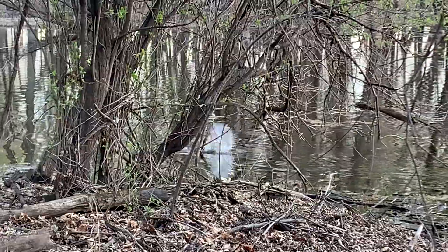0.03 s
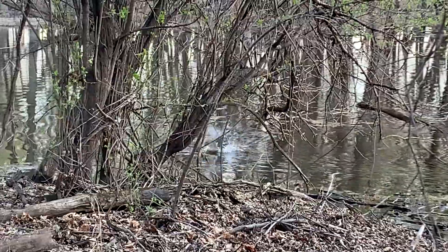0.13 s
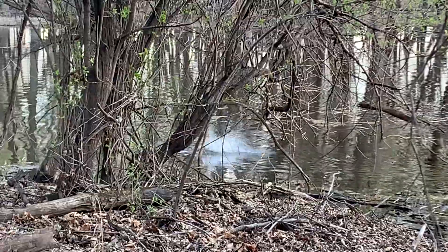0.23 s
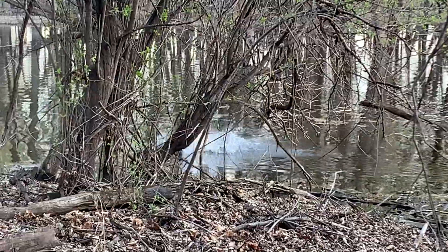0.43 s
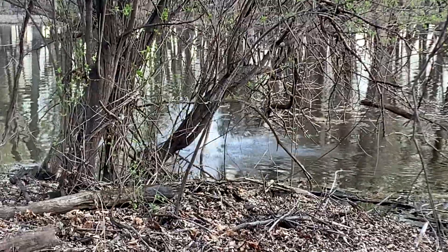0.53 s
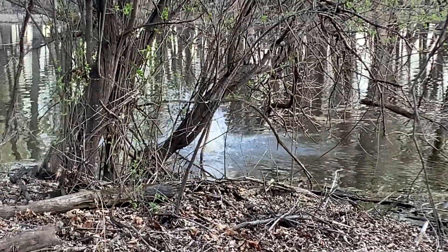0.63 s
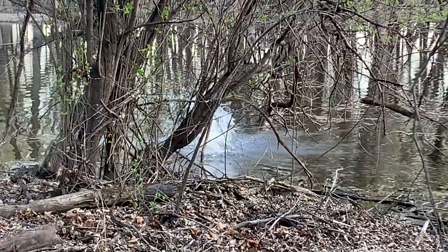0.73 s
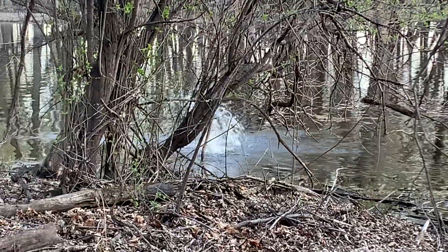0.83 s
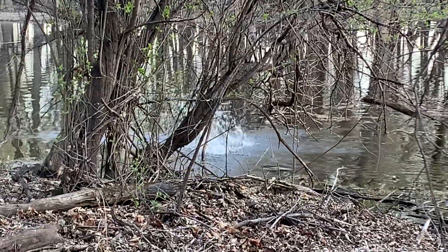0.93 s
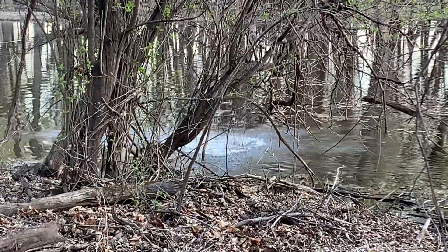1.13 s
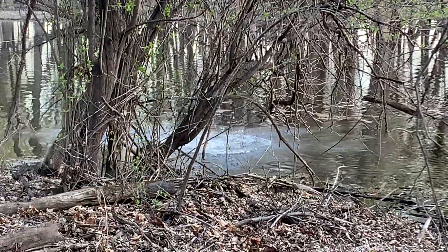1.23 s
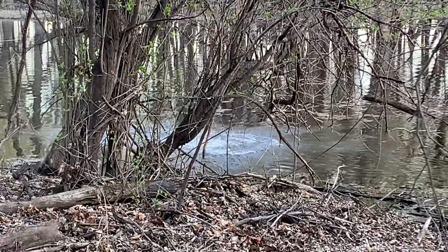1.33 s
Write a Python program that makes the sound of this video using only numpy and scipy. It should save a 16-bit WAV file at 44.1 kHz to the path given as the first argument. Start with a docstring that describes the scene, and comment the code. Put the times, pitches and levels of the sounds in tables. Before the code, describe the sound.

Sharp beaver tail slap on still water, then a hollow gulp and two showers of drops

```python
"""Low outdoor rumble and faint lapping on a wooded pond, then a beaver slaps its tail.
A brief noise swell leads into a noise crack; snaps and a short thump of trapped air are decaying sines.
A quarter second later the hole in the water closes: a deep whump, one sine gliding in pitch.
Thrown water falls back in two showers of small rings, with single ticks and plinks.
The trunks return the slap as decaying noise echoes."""
import sys
import numpy as np
from scipy import signal
from scipy.fft import rfft, irfft
from scipy.io import wavfile

SR = 44100
rng = np.random.default_rng(int(sys.argv[2]) if len(sys.argv) > 2 else 0)


def waveform_to_disk(signal):
    """Save audio, clipped to [-1, 1], as 16-bit WAV at the path in sys.argv[1]."""
    frames = np.transpose(np.atleast_2d(signal))
    scaled = np.clip(frames, -1, 1) * 32767
    samples = np.round(scaled).astype(np.int16)
    wavfile.write(sys.argv[1], SR, samples)


N = 61739

SLAP_S = .22065


def undb(db):
    """Decibels to gain."""
    return 10 ** (np.asarray(db) / 20)


def unit(x):
    """Scale to rms 1."""
    return x / np.sqrt(np.mean(x ** 2))


def seconds():
    """Time of every sample."""
    return np.arange(N) / SR


def bins_hz():
    """Frequency of every bin of a spectrum padded to 2 N."""
    return np.arange(N + 1) * SR / (2 * N)


def curve(table, axis=1):
    """One column of a table, joined by straight lines in time."""
    rows = np.array(table)
    return np.interp(seconds(), rows[:, 0], rows[:, axis])


def by_hz(points):
    """Points joined on a log-frequency axis, for every bin of the padded spectrum."""
    rows = np.array(points)
    return np.interp(np.log(bins_hz() + 1), np.log(rows[:, 0]), rows[:, 1])


def shape(x, response):
    """Filter by a frequency response."""
    return irfft(rfft(x, 2 * N) * response)[:N]


def colour(x, points):
    """Causal minimum-phase filter through (frequency [Hz], level [dB]) points."""
    cepstrum = irfft(np.log(undb(by_hz(points))))
    # fold the cepstrum onto positive time
    cepstrum[1:N] *= 2
    cepstrum[N + 1:] = 0
    return shape(x, np.exp(rfft(cepstrum)))


def add(out, start_s, sound):
    """Mix a sound in at a time."""
    i = max(int(start_s * SR), 0)
    out[i:i + len(sound)] += sound[:max(N - i, 0)]


def grains(rate_per_s, low_hz, high_hz, cycles, spread_db, glide=0.063):
    """A steady rain of little decaying rings, each rising in pitch; rms 1."""
    out = np.zeros(N)
    own = np.random.default_rng(rng.integers(1 << 30))
    for when, pitch, size, length in own.random((int(rate_per_s * N / SR), 4)):
        hz = low_hz * (high_hz / low_hz) ** pitch
        life_s = cycles * (.5 + length) / hz
        age = np.arange(int(2 * life_s * SR) + 2) / SR
        turns = hz * age * (1 + glide * age / life_s / 2)
        ring = np.sin(2 * np.pi * turns) * np.exp(-np.pi * age / life_s)
        loudness = undb(-spread_db * np.log(1 - .985 * size))
        add(out, when * N / SR, ring * hz * loudness)
    return unit(out)


# outdoor air colour: (frequency [Hz], level [dB])
AIR_COLOUR = [(31, -25.5), (42, 0), (90, 4), (140, -8), (250, -11), (500, -25.5), (1000, -32.5),
              (2200, -44.5), (3500, -51.5), (8000, -43.5), (16000, -56.5)]
# rumble level: (time [s], level [dB])
RUMBLE_LEVEL = [(0, -49), (.75, -50.5), (.88, -44), (1.4, -45.5)]
AIR_DB = -47.5
RUMBLE_HZ, RUMBLE_WIDTH_HZ = 58, 2.9
RUMBLE_WAVER_DB, RUMBLE_WAVER_HZ = 2.5, 9


def waver():
    """Slow random wander: noise under a Gaussian low-pass; rms 1."""
    return unit(shape(rng.standard_normal(N), np.exp(-(bins_hz() / RUMBLE_WAVER_HZ) ** 2)))


def background():
    """Coloured noise for outdoor air; a low sine wavering in pitch and level rumbles and swells."""
    air = undb(AIR_DB) * unit(colour(rng.standard_normal(N), AIR_COLOUR))
    turns = np.cumsum(RUMBLE_HZ + RUMBLE_WIDTH_HZ * waver()) / SR
    rumble = unit(np.sin(2 * np.pi * turns) * undb(RUMBLE_WAVER_DB * waver()))
    return air + rumble * undb(curve(RUMBLE_LEVEL))


# falling water: (time [s], splashing level [dB], fine spray level [dB])
SHOWER_LEVELS = [(.225, -53.5, -47), (.30, -56, -65), (.402, -59.5, -69.5), (.412, -49, -57),
                 (.445, -50.5, -62), (.485, -50, -51.5), (.56, -50.5, -56.5), (.66, -53.5, -59),
                 (.81, -54.5, -64), (.88, -53, -58.5), (.96, -49.5, -57), (1.06, -51, -56),
                 (1.15, -48.5, -52), (1.225, -49.5, -53.5), (1.28, -57, -59.5), (1.335, -60, -64),
                 (1.4, -61, -66)]
# gurgle level of the churning water: (time [s], level [dB])
CHURN_LEVEL = [(.23, -44.5), (.28, -52.5), (.37, -55.5), (.46, -46.5), (.55, -49.5), (.82, -58.5),
               (1.2, -59.5), (1.4, -68)]
# gurgle, splash and spray colours: (frequency [Hz], level [dB])
GURGLE_COLOUR = [(110, -0.5), (240, 3), (400, -6.5), (600, 0), (900, -9.5)]
SPLASH_COLOUR = [(300, -30), (600, -3.5), (850, -7), (1250, 0), (1800, -1), (2400, -1), (3200, -10),
                 (5000, -12.5)]
SPRAY_COLOUR = [(1500, -30), (3400, 0), (5000, -3), (7200, -1), (11500, -6.5), (15500, -17.5)]
# cycles are the mean ring life
BUBBLES_PER_S, BUBBLE_SPREAD_DB, BUBBLE_CYCLES = 600, 2.5, 6.4
DROPS_PER_S, DROP_SPREAD_DB, DROP_CYCLES = 3500, 1.5, 8.3
FINE_PER_S, FINE_SPREAD_DB, FINE_CYCLES = 4000, 2, 1.6
# water rushing back into the hole
SURGE_S, SURGE_END_S, SURGE_RELEASE_S, SURGE_DB = .408, 0.57, 0.054, -55
SURGE_LOW_HZ, SURGE_TOP_HZ = 510, 794
# lapping around the swimming animal, which stops as the tail is raised
LAP_DB, LAP_END_S, LAP_FADE_S = -67.5, 0.12, 0.01
THROW_RISE_S = 0.0054


def falling_water():
    """Ring grains: lapping before the slap; gurgling bubbles, a surge, drops and fine spray after."""
    t = seconds()
    bubbles = grains(BUBBLES_PER_S, 110.7, 874.0, BUBBLE_CYCLES, BUBBLE_SPREAD_DB)
    gurgle = unit(colour(bubbles, GURGLE_COLOUR))
    drops = unit(colour(grains(DROPS_PER_S, 575.0, 4000, DROP_CYCLES, DROP_SPREAD_DB), SPLASH_COLOUR))
    spray = unit(colour(grains(FINE_PER_S, 2540, 17000, FINE_CYCLES, FINE_SPREAD_DB), SPRAY_COLOUR))
    surge = grains(BUBBLES_PER_S, SURGE_LOW_HZ, SURGE_TOP_HZ, BUBBLE_CYCLES, BUBBLE_SPREAD_DB)

    surge_release = np.exp(-np.maximum(t - SURGE_END_S, 0) / SURGE_RELEASE_S)
    rush_gain = undb(SURGE_DB) * (t > SURGE_S) * surge_release
    lap_gain = undb(LAP_DB) * np.exp(-np.maximum(t - LAP_END_S, 0) / LAP_FADE_S)
    thrown = np.clip((t - SLAP_S) / THROW_RISE_S, 0, 1)

    shower = gurgle * undb(curve(CHURN_LEVEL))
    shower += drops * undb(curve(SHOWER_LEVELS))
    shower += spray * undb(curve(SHOWER_LEVELS, axis=2))
    return lap_gain * drops + rush_gain * surge + thrown * shower


# sharp ticks: (time [s], level [dB], pitch [Hz], spatter decay [s])
TICK_EVENTS = [(0.0454, -37.5, 8030, 0.0015), (.412, -42.5, 1290, 0.0056), (1.15, -38, 5700, 0.00077),
               (1.214, -37, 3390, 0.001), (1.2318, -38.5, 2930, 0.00069), (1.3515, -43, 4630, 0.0016)]
TICK_TAIL_DB = -0.5


def ticks():
    """Heavy drops: a click and a short noise spatter, band-shaped around one pitch."""
    out, age = np.zeros(N), seconds()
    click = unit(signal.unit_impulse(N))
    for start_s, db, hz, decay_s in TICK_EVENTS:
        spatter = unit(rng.standard_normal(N) * np.exp(-age / decay_s))
        band = [(hz / 3, -20), (hz, 0), (hz * 4, -38)]
        tick = unit(colour(click + undb(TICK_TAIL_DB) * spatter, band))
        # rms of the decay sets the energy of a tick
        add(out, start_s, undb(db) * tick * np.sqrt(np.mean(np.exp(-2 * age / decay_s))))
    return out


# bubbles that plink or gulp: (time [s], peak level [dB], pitch [Hz], decay [s])
PLINK_EVENTS = [(0.054, -52, 1120, 0.008), (0.242, -38, 92, 0.016), (.279, -45, 452, 0.011),
                (.284, -40, 227, 0.0099), (0.299, -41.5, 142, 0.014), (0.375, -40.5, 245, 0.016),
                (.947, -42, 2000, 0.0038), (.957, -46, 1176, 0.0047), (1.049, -40, 1650, 0.00374),
                (1.363, -51, 1670, 0.0054)]


def plinks():
    """Single bubbles: sines that swell to a peak at half the decay time, then die away."""
    out, age = np.zeros(N), seconds()
    for start_s, db, hz, decay_s in PLINK_EVENTS:
        swell = age / decay_s * 2 * np.exp(1 - 2 * age / decay_s)
        add(out, start_s, undb(db) * np.sin(2 * np.pi * hz * age) * swell)
    return out


# closing air cavity: (time [s], pitch [Hz], level [dB])
CAVITY_PATH = [(.4645, 125, -30), (.469, 100.4, -22), (.478, 77.8, -22.5), (.497, 62.2, -24),
               (.52, 67.4, -27), (.557, 79, -31), (.583, 88.8, -33.5), (.612, 108.7, -32.5),
               (.63, 95.6, -40), (.70, 85.2, -53)]


def cavity():
    """One huge bubble pinches off, sinks in pitch, rises as it nears the surface, then sags."""
    sounding = seconds() > CAVITY_PATH[0][0]
    turns = np.cumsum(curve(CAVITY_PATH) * sounding) / SR
    return -np.sin(2 * np.pi * turns) * undb(curve(CAVITY_PATH, axis=2))


# far wood colour: (frequency [Hz], level [dB])
FAR_COLOUR = [(100, -3), (250, -3.5), (420, 11), (900, -23.5), (2200, -2.5), (6000, 0.5), (14000, -51)]
# near trunk colour: (frequency [Hz], level [dB])
NEAR_COLOUR = [(200, -8), (1200, 3.5), (2500, 4.5)]
# levels before colouring
FAR_DB, FAR_T60_S, NEAR_DB, NEAR_T60_S = -17, 1, -14, 0.081


def echo_tail(t60_s):
    """Exponentially decaying noise with unit energy."""
    return unit(rng.standard_normal(N) * np.exp(-np.log(1000) * seconds() / t60_s)) / np.sqrt(N)


def woods(x):
    """Near trunks scatter the slap briefly; the far wood rings on."""
    near = shape(undb(NEAR_DB) * echo_tail(NEAR_T60_S), undb(by_hz(NEAR_COLOUR)))
    far = colour(undb(FAR_DB) * echo_tail(FAR_T60_S), FAR_COLOUR)
    return signal.fftconvolve(x, near + far)[:N]


# lead-in colour: (frequency [Hz], level [dB])
LEAD_IN_COLOUR = [(200, -15), (2000, -0.5), (3500, -9.5), (7000, -4.5)]
LEAD_IN_DB, LEAD_IN_RISE_S = -33.5, 0.012


def lead_in():
    """A short coloured noise swelling exponentially until the slap."""
    lead = SLAP_S - seconds()
    swell = np.exp(-np.abs(lead) / LEAD_IN_RISE_S) * (lead > 0)
    return undb(LEAD_IN_DB) * unit(colour(rng.standard_normal(N), LEAD_IN_COLOUR)) * swell


# crack colour: (frequency [Hz], level [dB])
CRACK_COLOUR = [(900, -8.5), (1500, 2), (2200, 8), (3400, -8.5), (4900, -9), (5800, 2.5), (6400, -11),
                (7300, 4), (10000, -10.5), (16000, -3.5)]
CRACK_DB, CRACK_RISE_S, CRACK_FALL_S = -22, 0.0025, 0.0008


def crack():
    """The flat tail meets the surface: a coloured noise burst, rising and falling exponentially."""
    since = seconds() - SLAP_S
    burst = np.exp(-np.maximum(-since / CRACK_RISE_S, since / CRACK_FALL_S))
    noise = unit(colour(burst * rng.standard_normal(N), CRACK_COLOUR))
    return undb(CRACK_DB) * noise * np.sqrt(np.mean(burst ** 2))


# small air pockets under the tail: (pitch [Hz], level [dB], Gaussian decay [s])
SNAP_POCKETS = [(1520, -23.5, 0.0019), (2144, -15.5, 0.002), (2575, -21.5, 0.0017), (5830, -29, 0.0011),
                (7250, -30, 0.0011)]
SNAP_RISE_S = 0.00036


def snap():
    """Small air pockets snap: sines with a fast Gaussian rise and a slower Gaussian fall."""
    since = seconds() - SLAP_S
    out = np.zeros(N)
    for hz, db, decay_s in SNAP_POCKETS:
        width_s = np.where(since < 0, SNAP_RISE_S, decay_s)
        out -= undb(db) * np.sin(2 * np.pi * hz * since) * np.exp(-(since / width_s) ** 2)
    return out


THUMP_S, THUMP_HZ, THUMP_START_HZ, THUMP_SETTLE_S = .22112, 208, 570, .00118
THUMP_DB, THUMP_ATTACK_S, THUMP_LENGTH_S, THUMP_TOP_HZ = -16.5, 0.00046, 0.01, 705
OVERTONE_HZ, OVERTONE_DB, OVERTONE_DECAY_S = 521, -24, 0.0037


def thump():
    """The large air pocket: a sine falling in pitch plus a steady overtone, low-passed."""
    since = seconds() - THUMP_S
    before, age = np.minimum(since, 0), np.maximum(since, 0)
    glide_turns = (THUMP_START_HZ - THUMP_HZ) * THUMP_SETTLE_S * (1 - np.exp(-age / THUMP_SETTLE_S))
    turns = THUMP_START_HZ * before + THUMP_HZ * age + glide_turns
    tone = undb(THUMP_DB) * np.sin(2 * np.pi * turns) * np.exp(-(age / THUMP_LENGTH_S) ** 3)
    overtone = undb(OVERTONE_DB) * np.sin(2 * np.pi * OVERTONE_HZ * since)
    overtone *= np.exp(-age / OVERTONE_DECAY_S)
    attack = np.exp(-(before / THUMP_ATTACK_S) ** 2)
    low_pass = 1 / (1 + (bins_hz() / THUMP_TOP_HZ) ** 16)
    return shape((tone + overtone) * attack, low_pass)


def slap():
    """The tail strike: crack of the surface, snaps and thump of the trapped air."""
    return crack() + snap() + thump()


# stereo phase: (frequency [Hz], left lead [rad])
PHASE_LEAD = [(1000, 0), (2100, 0.95), (3000, 1.36), (4100, -0.17), (4700, 1.03), (5500, 1.2), (7000, -0.7),
              (8200, -3), (9000, -2.5), (10400, -6.5), (11600, -5), (12600, -9), (15000, -8.5)]
# stereo balance: (frequency [Hz], left minus right [dB])
BALANCE = [(60, -1), (1500, 0), (2400, 4.5), (3500, -1), (5000, -3.5), (8000, -0.5)]
# unrelated share: (frequency [Hz], level [dB])
UNRELATED_SHARE = [(60, -17), (250, -7), (600, -5.5), (1500, -7.5), (3200, -7.5), (6000, -4), (10000, -53)]


def stereo(common, scattered):
    """Left and right differ in phase and level; scattered sound differs between them."""
    side = shape(scattered, undb(by_hz(UNRELATED_SHARE)))
    # each side takes half the phase and level difference
    half = np.exp(.5j * by_hz(PHASE_LEAD)) * undb(by_hz(BALANCE) / 2)
    return np.array([shape(common + side, half), shape(common - side, 1 / half)])


def scene():
    """Direct sounds, plus two unrelated shares of the spread-out ones."""
    hit = slap()
    spread = [background() + falling_water() + woods(hit) + lead_in() for _ in range(2)]
    direct = ticks() + plinks() + cavity() + hit
    return stereo(direct + spread[0], spread[1])


TOP_HZ = 16000


def record(dry):
    """Steep elliptic low-pass at TOP_HZ."""
    return signal.sosfilt(signal.ellip(8, .2, 70, TOP_HZ, fs=SR, output="sos"), dry)


dry = scene()
out = record(dry)
waveform_to_disk(out)
```